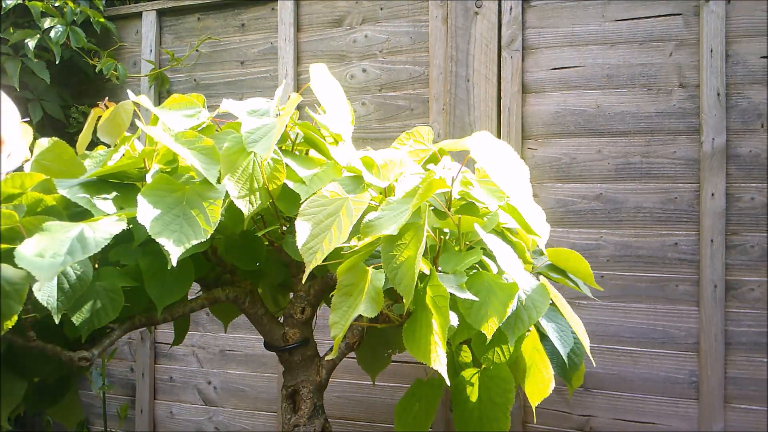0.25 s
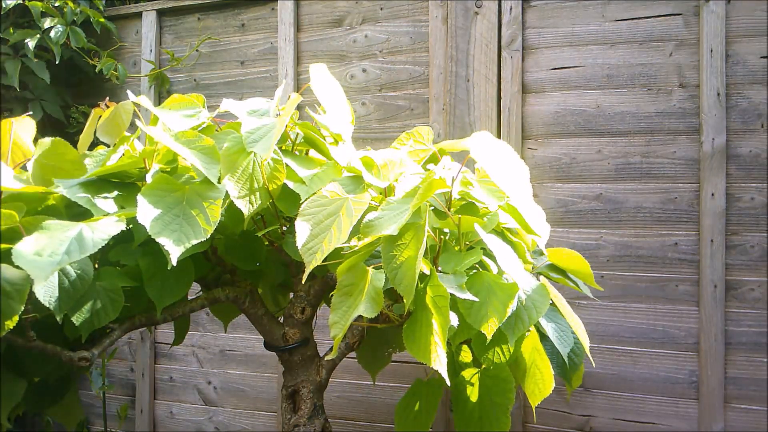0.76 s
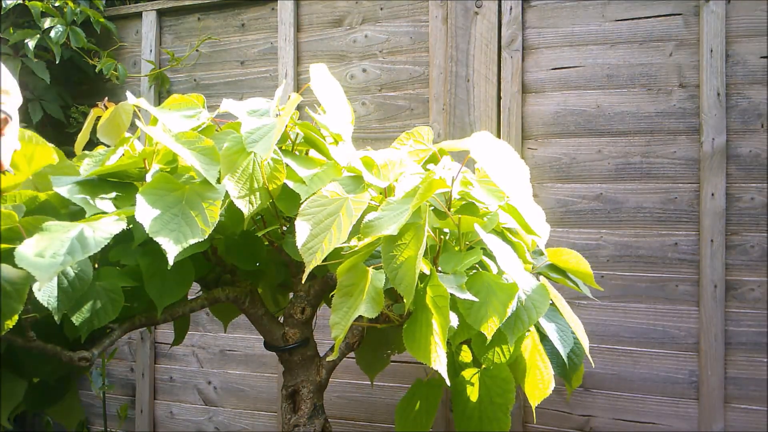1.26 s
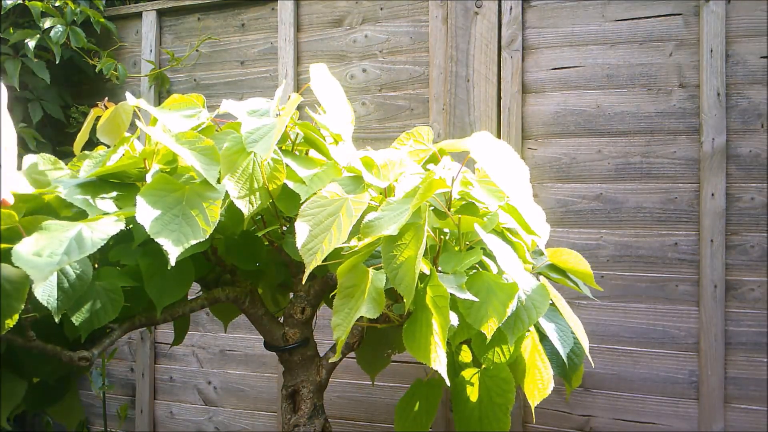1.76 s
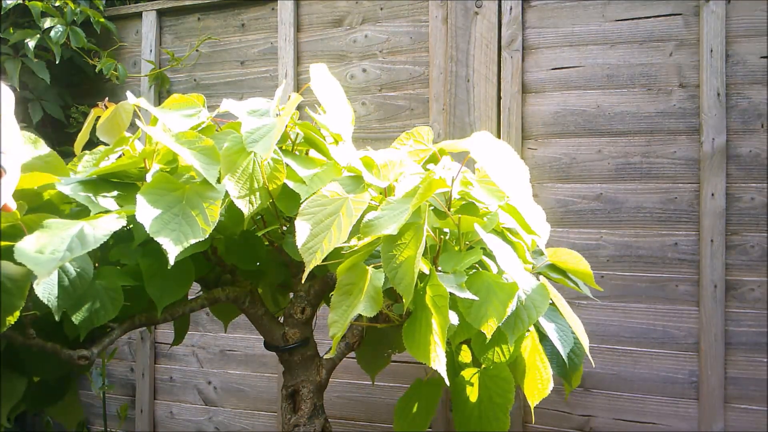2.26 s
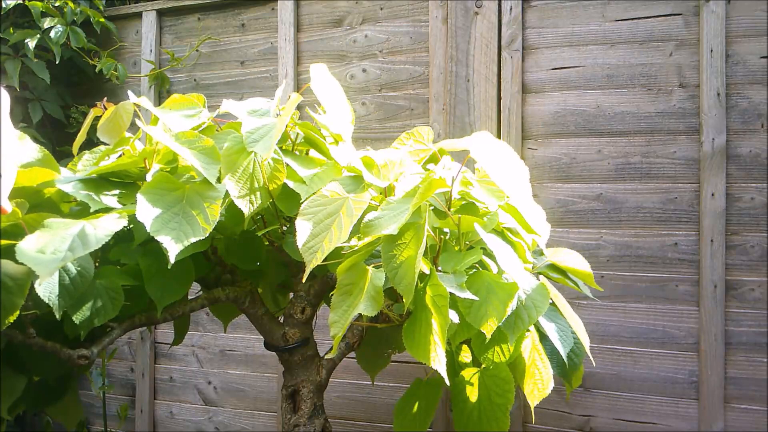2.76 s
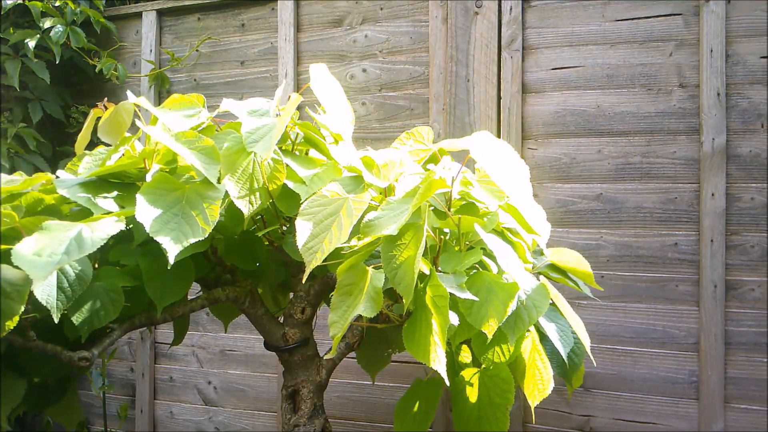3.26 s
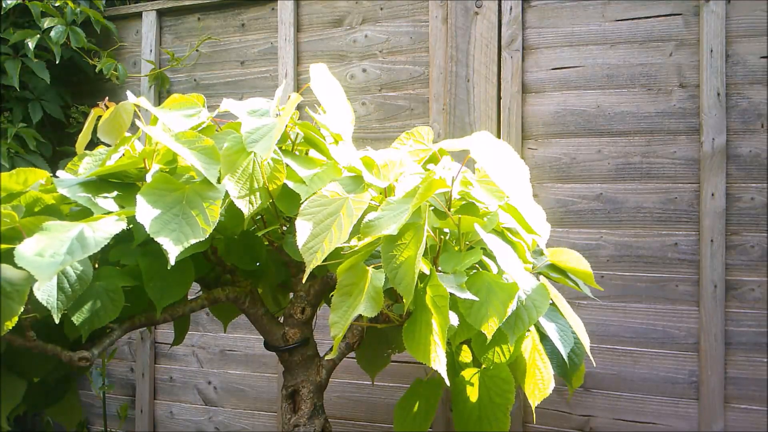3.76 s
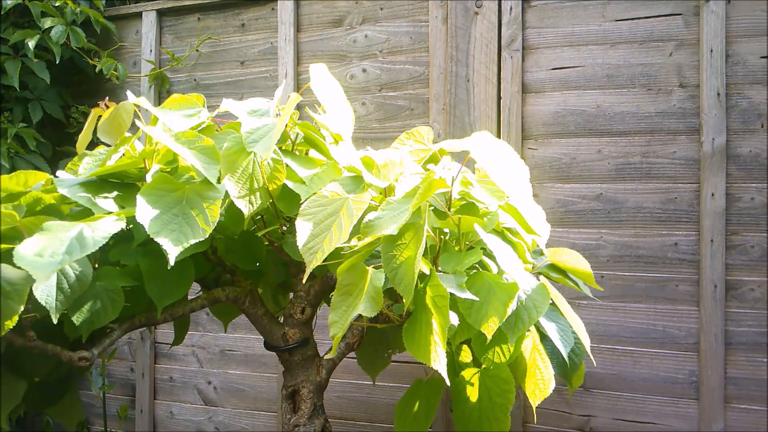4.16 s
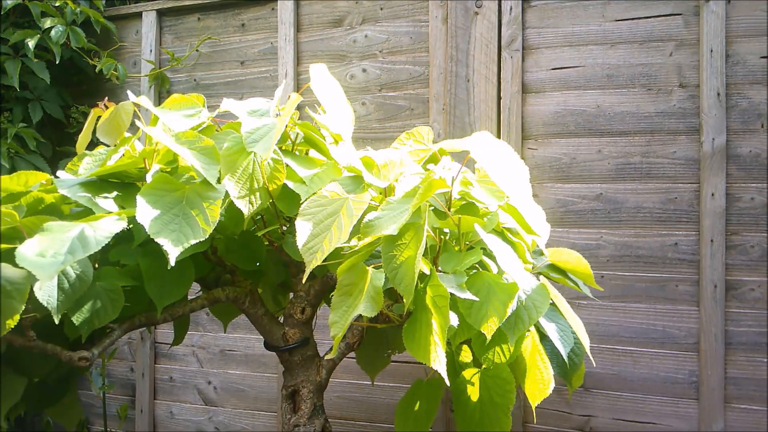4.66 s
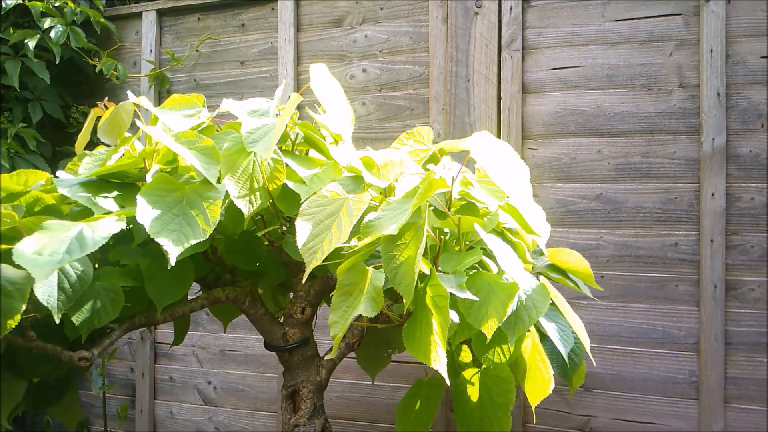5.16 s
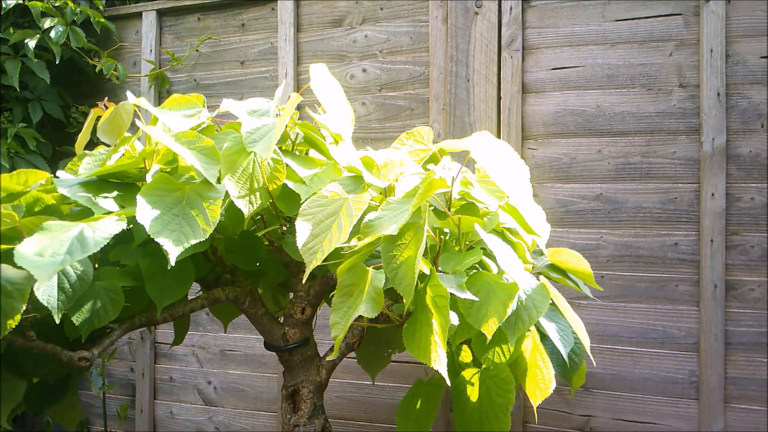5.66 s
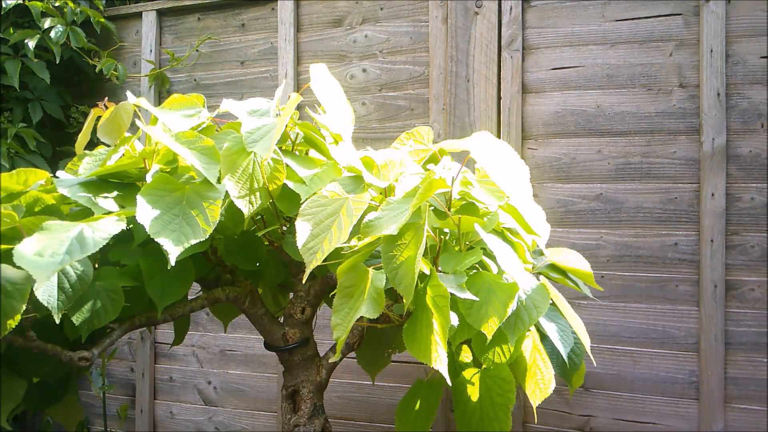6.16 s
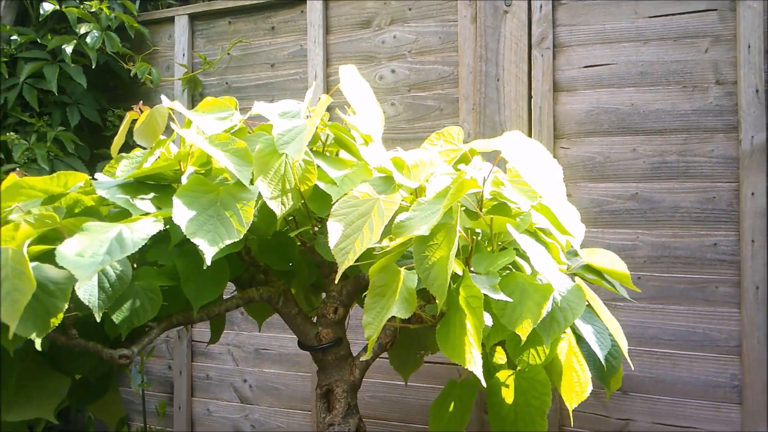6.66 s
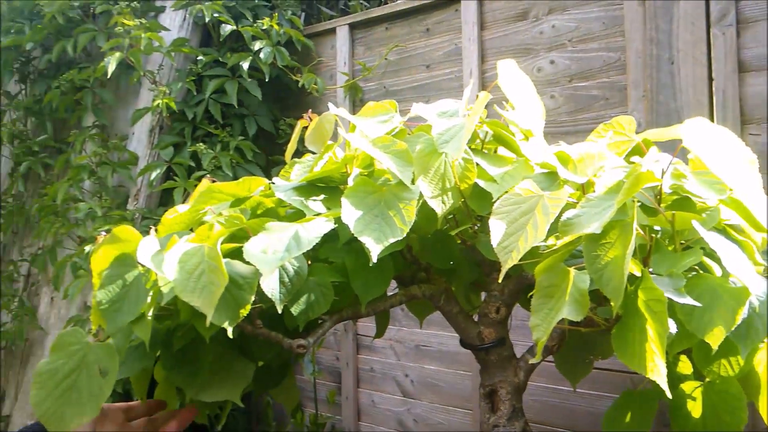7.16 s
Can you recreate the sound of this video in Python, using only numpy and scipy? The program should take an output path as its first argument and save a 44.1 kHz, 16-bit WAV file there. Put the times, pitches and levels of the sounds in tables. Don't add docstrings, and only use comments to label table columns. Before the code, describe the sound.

Small scissors snip two shoots of a potted garden tree while hands rustle its leaves, with low wind rumble on the microphone.

```python
import sys
import numpy as np
from scipy import signal
from scipy.fft import rfft, irfft, next_fast_len
from scipy.io import wavfile
from scipy.ndimage import uniform_filter1d

SR = 44100
rng = np.random.default_rng(int(sys.argv[2]) if len(sys.argv) > 2 else 0)


def nominal_scale(level):
    x = np.asarray(level, float) / 20
    return 10 ** x


def output_pcm(signal):
    pcm = np.clip(np.atleast_2d(signal).T, -1, 1) * 32767
    wavfile.write(sys.argv[1], SR, np.round(pcm).astype(np.int16))


N = 326781


def evened(x):
    return x / np.sqrt(np.mean(x ** 2) + 1e-20)


def steadied(x, size):
    return x / np.sqrt(abs(uniform_filter1d(x ** 2, size)) + 1e-20)


def smooth_noise(size):
    return evened(uniform_filter1d(rng.standard_normal(N), size=size))


def read(points, hz):
    f, value = np.transpose(points)
    return np.interp(np.log(hz + 1), np.log(f + 1), value)


def along(table):
    s, *columns = np.transpose(table)
    return [np.interp(np.arange(N) / SR, s, c) for c in columns]


def coloured(x, points):
    size = next_fast_len(len(x))
    gain = nominal_scale(read(points, np.fft.rfftfreq(size, 1 / SR)))
    return irfft(rfft(x, size) * gain, size)[:len(x)]


def add(mix, s, sound):
    part = mix[round(s * SR):][:len(sound)]
    part += sound[:len(part)]


def patchy(patch_db):
    a, b, patches = rng.standard_normal((N // 128 + 5, 257, 3)).T
    patches = uniform_filter1d(patches, size=8, axis=0)
    patches = evened(uniform_filter1d(patches, size=14, axis=1))
    spectrum = (a + 1j * b) * nominal_scale(patch_db * patches)
    return evened(signal.istft(spectrum, nperseg=512, noverlap=384)[1][:N])


def crackle(per_s, spread_db, clump_db):
    clumps = smooth_noise(700)
    size = nominal_scale(spread_db * np.minimum(rng.exponential(1, N), 4) + clump_db * clumps)
    happens = rng.random(N) < per_s / SR
    return evened(size * rng.standard_normal(N) * happens)


def ring(hz, t60, t):
    return nominal_scale(-60 * t / np.maximum(t60, .002)) * np.sin(2 * np.pi * hz * t)


def wind():
    # t/s, strength/dB, share of small fast eddies/dB
    gusts = [(0, -36, -8), (.17, -29.5, -14.5), (.48, -41.5, -8), (.68, -37.5, -14.5), (1.0, -49, -3),
             (1.7, -36.5, -18), (2.1, -41.5, -7), (2.6, -41.5, -5), (3.15, -36.5, -10.5), (3.65, -41.5, -5),
             (4.2, -41.5, -1), (4.46, -36, -5.5), (4.7, -38.5, -2), (5.2, -32, -5.5), (5.45, -37, -2.5),
             (6.33, -38.5, -8.5), (6.85, -50.5, 0), (7.41, -42, -12)]
    # f/Hz, density/dB per Hz
    buffet = [(1, -13.5), (2, 13.5), (14, 12.5), (22, 6), (28, -53)]
    flutter = [(16, -35.5), (22, 13.5), (40, 8), (55, 3.5), (70, -45.5)]
    throb = [(42, -37), (55, 11), (72, 3), (90, -2), (115, -48.5)]
    thrum = [(68, -33), (90, -4), (115, -6), (140, -15.5), (200, -19), (300, -55.5)]
    # offset/dB, part of strength, part of eddy share, rise after the wind veers/dB per s
    layers = [
        (-22.5, 0.39, .05, -1.24),
        (.6, 1.0, 0.025, -0.06),
        (-1.7, 0.97, 0.91, 0.67),
        (-9.5, 0.97, 1, 2.6),
    ]
    strength_db, small_db = along(gusts)
    veer_s = np.maximum(np.arange(N) / SR - 4.1, 0)
    out = np.zeros(N)
    for shape, (db, a, b, rise_db) in zip((buffet, flutter, throb, thrum), layers):
        noise = coloured(rng.standard_normal(N), shape)
        level_db = db + a * strength_db + b * small_db + rise_db * veer_s
        out += nominal_scale(level_db) * steadied(noise, size=5000)
    return out


def garden():
    # f/Hz, density/dB per Hz
    wash = [(290, -26), (500, -0.5), (1000, -5.5), (1900, -15), (3000, -29.5), (4200, -38.5), (6000, -40),
            (8500, -32.5)]
    # t/s, level/dB
    wash_level = [(0, -52.5), (1.6, -59.5), (2.2, -57), (2.8, -56), (4.5, -53.5), (5.8, -60), (6.5, -61),
                  (7.41, -63.5)]
    return nominal_scale(along(wash_level)[0]) * evened(coloured(patchy(2.7), wash))


def brushing():
    # start/s, length/s, strength/dB, dryness (hiss over rustle)/dB
    brushes = [(.0, 0.16, -51.5, -1.5), (0.192, 0.062, -46.5, -5), (0.278, 0.016, -62.5, 5),
               (0.373, 0.23, -52.5, -2), (0.826, 0.11, -64.5, 1), (0.976, 0.38, -59, -5),
               (1.377, 0.024, -64, 5), (1.44, 0.049, -66, 7), (1.737, 0.042, -64, 4),
               (2.93, 0.29, -61.5, -2), (3.197, 0.35, -55.5, -3.5), (3.441, 0.083, -51, -3),
               (3.561, 0.1, -59.5, 4.5), (3.711, 0.26, -54, 3), (3.969, .13, -53, 4.5),
               (4.124, 0.049, -52.5, -2), (4.176, 0.15, -59, -6), (4.3, 0.082, -59, -2),
               (4.376, 0.1, -51.5, -2), (4.574, 0.34, -60.5, 3), (4.848, .1, -43.5, -3.5),
               (4.959, 0.057, -44.5, -4.5), (5.073, 0.033, -65, -4), (5.21, 0.34, -64, -2.5),
               (5.543, 0.045, -56.5, -5.5), (5.665, .1, -68, -15.5), (6.462, 0.014, -62.5, -7.5),
               (6.78, 0.15, -72, -10), (7.13, 0.1, -75, -14), (7.297, .08, -65.5, -9.5)]
    rise_share = 0.55
    sag_db, settle_db_per_s = -10.5, 502
    quiver_db, quiver_db_per_s = -16, 51.5
    t = np.arange(SR) / SR
    rustle, hiss = np.full(N, nominal_scale(-73)), np.full(N, nominal_scale(-77))
    for s, length_s, db, dry_db in brushes:
        after_s = np.maximum(t - length_s, 0)
        rise = np.sin(np.pi / 2 * np.minimum(t / (rise_share * length_s), 1))
        fall = nominal_scale(sag_db * np.minimum(t / length_s, 1) - settle_db_per_s * after_s)
        quiver = nominal_scale(quiver_db - quiver_db_per_s * after_s)
        shape = rise * nominal_scale(db) * (fall + quiver)
        add(rustle, s, shape)
        add(hiss, s, nominal_scale(dry_db) * shape)
    drift = uniform_filter1d(uniform_filter1d(rng.standard_normal(N), size=700), size=700)
    flutter = nominal_scale(2.4 * evened(drift))
    return flutter * rustle, flutter * hiss


def leaves():
    # t/s, level/dB
    hands = [(0.0, -56.5), (0.37, -47.5), (0.47, -47), (0.68, -56), (1.28, -58), (2.02, -54), (2.81, -62),
             (3.34, -52), (3.73, -57.5), (3.98, -55.5), (4.33, -48), (4.83, -50), (5.02, -49.5),
             (5.22, -53), (5.61, -50), (5.82, -55), (6.56, -61), (7.41, -60.5)]
    # f/Hz, density/dB per Hz
    sway_shape = [(90, -33), (140, -4), (200, 2), (310, 3), (450, -1.5), (650, -16.5), (1000, -60.5)]
    flap_shape = [(350, -9.5), (600, -1), (1000, -6), (1500, -8.5), (2100, -17.5), (3000, -33.5)]
    rustle_shape = [(900, -17.5), (1600, -5), (2200, -2.5), (3200, -7.5), (4500, -7.5), (6000, -26)]
    hiss_shape = [(3500, -45.5), (4800, -7.5), (5700, -6), (6300, 0), (7500, 4), (9000, -12.5)]
    snaps = crackle(1500, spread_db=1.5, clump_db=1.0)
    creaks = crackle(400, spread_db=3.0, clump_db=0.0)
    sway = coloured(patchy(2.5) + 0.5 * creaks, sway_shape)
    flap = coloured(patchy(2.0) + 0.36 * snaps, flap_shape)
    rustle = coloured(patchy(1.0) + 0.83 * snaps, rustle_shape)
    hiss = coloured(patchy(0.89) + 0.75 * snaps, hiss_shape)
    push = nominal_scale(along(hands)[0])
    brush, dry_brush = brushing()
    gains = nominal_scale(1.5) * push, nominal_scale(-7) * push + nominal_scale(-4.5) * brush, brush, dry_brush
    return sum(gain * steadied(x, size=4000) for gain, x in zip(gains, (sway, flap, rustle, hiss)))


def slipping(start, end, start_hz, end_hz, db, width_hz):
    n = round((end - start) * SR)
    hz = np.linspace(start_hz, end_hz, n) * (1 + 0.07 * np.hanning(n))
    turn = np.exp(2j * np.pi * np.cumsum(hz) / SR)
    r = np.exp(-np.pi * width_hz / SR)
    a, b, slips = rng.standard_normal((3, SR // 2))
    slips = nominal_scale(1.9 * evened(uniform_filter1d(slips, size=500)))[:n]
    band = signal.lfilter([1], [1, -2 * r, r * r], (a + 1j * b)[:n])
    return nominal_scale(db) * evened(slips * (band * turn).real) * signal.windows.tukey(n, .4)


def rubs():
    # start/s, end/s, start f/Hz, end f/Hz, level/dB
    strokes = [
        (0.098, 0.331, 1288, 1347, -47),
        (.31, .365, 1330, 1290, -47),
        (3.212, 3.332, 2400, 2490, -63),
        (3.762, 3.89, 7500, 6700, -68),
        (3.927, 4.014, 1500, 1446, -58),
    ]
    out = np.zeros(N)
    for start, end, start_hz, end_hz, db in strokes:
        add(out, start, slipping(start, end, start_hz, end_hz, db, width_hz=260))
    return out


def scrapes():
    # start/s, end/s, centre f/Hz, width/Hz, level/dB
    strokes = [(0.16, .25, 2600, 1800, -49.5), (2.9, 2.905, 1500, 3000, -39),
               (2.911, 2.926, 5600, 2000, -49), (2.909, 2.922, 1500, 1300, -45.5),
               (4.561, 4.578, 7300, 4000, -35.5), (4.587, 4.61, 7200, 1500, -58.5),
               (0.35, 0.494, 480, 340, -44.5), (4.913, 4.918, 3800, 5200, -34.5),
               (4.859, 4.863, 2200, 3900, -35.5), (6.4705, 6.476, 1660, 5800, -58),
               (4.32, 4.325, 2400, 3000, -47.5), (5.098, 5.115, 4600, 1500, -49.5),
               (5.455, 5.462, 1000, 800, -52), (3.196, 3.21, 480, 430, -62), (6.896, 6.903, 590, 600, -55),
               (4.965, 5.052, 2440, 800, -53), (7.13, 7.235, 2800, 1000, -68),
               (4.567, 4.574, 598, 700, -33), (2.896, 2.901, 1700, 1200, -34.5)]
    out = np.zeros(N)
    for start, end, hz, width_hz, db in strokes:
        add(out, start, slipping(start, end, hz, hz, db, width_hz))
    return out


def knocks():
    # t/s, peak/dB, f/Hz, t60/s
    bumps = [(0.283, -21.5, 181, 0.016), (0.394, -38, 440, 0.03), (0.443, -31.5, 445, 0.022),
             (0.93, -30.5, 163, 0.023), (1.047, -40, 290, 0.027), (1.383, -43, 320, 0.11),
             (1.523, -30.5, 290, 0.013), (2.898, -38, 315, 0.09), (3.197, -31.5, 198, 0.034),
             (4.028, -24, 290, 0.015), (4.566, -44.5, 418, 0.021), (4.979, -26, 347, 0.037),
             (5.006, -21.5, 187, 0.013), (5.411, -26, 340, 0.032), (5.53, -44, 205, 0.019),
             (5.66, -33.5, 158, 0.047), (6.896, -31, 173, 0.01), (7, -44.5, 297, 0.14),
             (7.179, -46.5, 307, 0.14)]
    out, t = np.zeros(N), np.arange(4000) / SR
    for s, db, hz, t60 in bumps:
        bump = ring(hz, t60, t) + 0.36 * ring(2.11 * hz, 0.69 * t60, t)
        add(out, s, nominal_scale(db + 2.0) * bump * (1 - np.exp(-t / 0.0003)))
    return out


def ticks():
    # t/s, peak/dB, f/Hz, treble/dB
    flicks = [(0.2882, -37.5, 1010, -62), (0.4249, -43, 950, -64), (1.0958, -52, 980, -64.5),
              (1.1219, -47, 1030, -71), (1.212, -54, 1030, -67), (3.114, -47, 960, -62),
              (3.271, -65, 1070, -62), (3.2883, -51, 2520, -68), (3.339, -52, 950, -66),
              (3.4919, -41.5, 1770, -62), (3.5565, -55.5, 3200, -74), (3.5806, -56, 1900, -67),
              (3.7668, -39.5, 1150, -81), (4.0997, -48.5, 2450, -75), (4.1478, -57, 1170, -56),
              (4.3214, -51, 2200, -52.5), (4.35, -55, 930, -57), (4.408, -44, 1290, -59.5),
              (4.8592, -35.5, 1120, -69), (4.9145, -36.5, 1320, -44.5), (4.9637, -47, 1930, -54),
              (5.322, -53, 1260, -73), (5.342, -47.5, 1160, -58), (5.456, -44.5, 1010, -62),
              (5.5855, -45.5, 1350, -68), (5.733, -44.5, 1420, -76), (6.1954, -51.5, 910, -79),
              (6.4717, -38, 1450, -62.5), (7.289, -56, 1060, -69), (7.346, -54, 1080, -70)]
    out, t = np.zeros(N), np.arange(1500) / SR
    for s, db, hz, treble_db in flicks:
        low, high = rng.standard_normal((2, len(t))) * nominal_scale(-60 * t / 0.015)
        body = ring(hz, 0.01, t) + 0.56 * uniform_filter1d(low, size=12)
        spit = high - uniform_filter1d(high, size=8)
        add(out, s, nominal_scale(db + 9.0) * body + nominal_scale(treble_db + 24) * spit)
    return out


def steel_part(modes, t):
    return sum(nominal_scale(db) * np.sign((hz - 1500) * (4500 - hz)) * ring(hz, t60, t) for hz, db, t60 in modes)


def scissors():
    # t/s, handle ring/dB, blade ring/dB, tip ring/dB, shoot crack/dB
    cuts = [
        (2.889, -64, -46, -43, -30),
        (2.894, -62, -36, -35.5, -33),
        (2.8983, -37, -36, -29, -27.5),
        (2.9076, -34.5, -26, -43.5, -16.5),
        (2.909, -60, -49, -11.5, -56),
        (4.5548, -55, -58, -37, -27.5),
        (4.5675, -30, -16, -29.5, -20),
        (4.5709, -12.5, -3, -13, -13),
        (4.5797, -44, -31, -36.5, -37),
    ]
    # f/Hz, level/dB, t60/s
    handle = [(1060, -3.5, 0.014), (430, -13.5, 0.019)]
    blade = [(2140, 0, .022), (2440, -7, .025), (3750, 0, .005), (5400, 6, .008)]
    tip = [(7340, -2.5, 0.0058), (5890, -23.5, 0.013)]
    out, t = np.zeros(N), np.arange(3000) / SR
    parts = [steel_part(modes, t) for modes in (handle, blade, tip)]
    parts[2] *= 1 - np.exp(-(t / 0.00062) ** 2)
    crack_fall = nominal_scale(-60 * t / 0.0077) + 0.11 * nominal_scale(-60 * t / 0.1)
    for s, *part_db, crack_db in cuts:
        steel = sum(nominal_scale(db) * part / abs(part).max() for db, part in zip(part_db, parts))
        crack = np.clip(rng.standard_normal(len(t)), -1.5, 1.5) * crack_fall
        add(out, s, steel + nominal_scale(crack_db) * crack)
    return out


def bird():
    # start/s, end/s, start f/Hz, end f/Hz, level/dB
    chirps = [
        (6.63, 6.68, 7700, 7200, -75),
        (6.62, 6.68, 6900, 6300, -70),
    ]
    out = np.zeros(N)
    for start, end, start_hz, end_hz, db in chirps:
        add(out, start, slipping(start, end, start_hz, end_hz, db, width_hz=150))
    return out


def scene():
    near = leaves() + rubs() + scrapes() + knocks() + ticks() + scissors()
    return (wind() + garden() + near + bird())[None]


def top_cut(x):
    return signal.sosfilt(signal.butter(12, 8580, fs=SR, output="sos"), x)


def record(dry):
    # f/Hz, gain/dB
    mic = [(20, 1.5), (3500, -5.5), (4300, -14.5), (4700, -19), (5200, -16.5), (6500, -10), (7400, -8),
           (7900, -16.5), (8250, -35), (8700, -71)]
    mix = coloured(dry[0], mic)[None]
    return top_cut(mix)


dry = scene()
out = record(dry)
output_pcm(out)
```